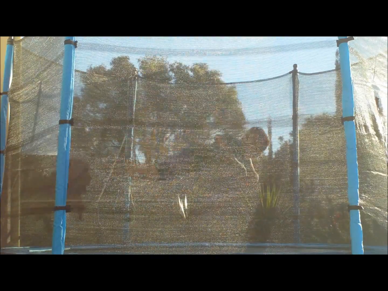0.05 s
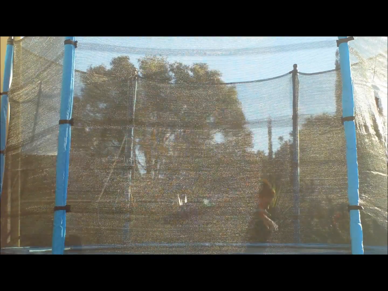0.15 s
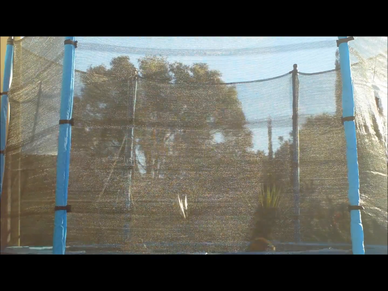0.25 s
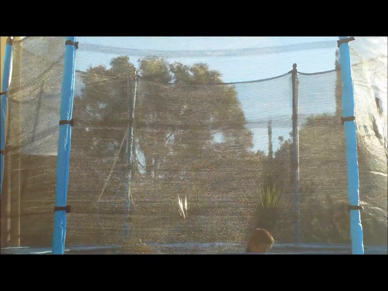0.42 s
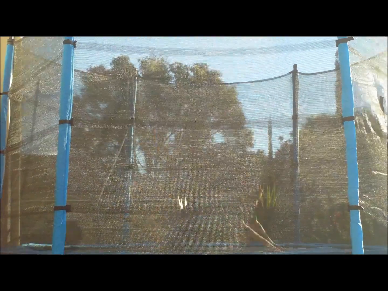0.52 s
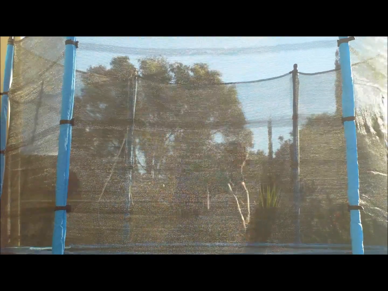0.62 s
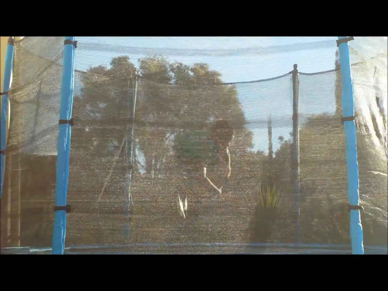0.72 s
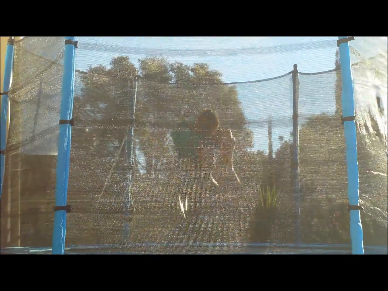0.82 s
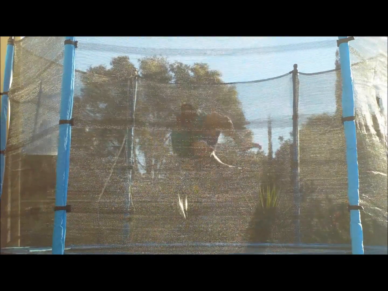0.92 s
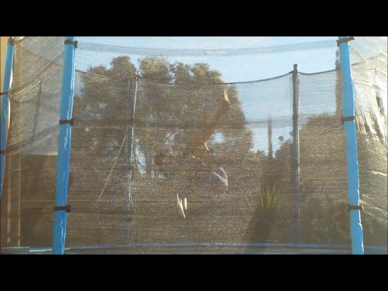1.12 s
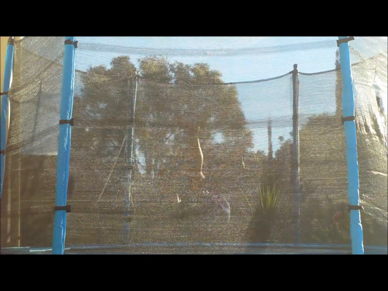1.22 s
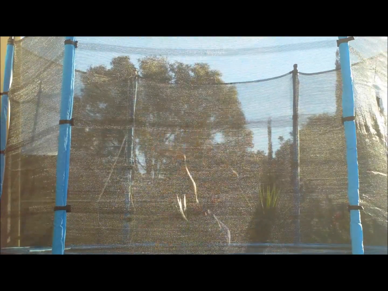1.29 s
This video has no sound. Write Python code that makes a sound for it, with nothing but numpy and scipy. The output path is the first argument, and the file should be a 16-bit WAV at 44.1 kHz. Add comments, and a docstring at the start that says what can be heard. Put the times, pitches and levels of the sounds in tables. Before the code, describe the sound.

One trampoline bounce, a sharp slap and thumps with steel springs grating and creaking.

```python
"""A trampoline mat takes a jumper: a sharp slap, a rumble of stretching fabric, thumps as the body sinks in.
The steel springs grate in their hooks by stick-slip, snap and ring on in the frame.
Behind them are a faint bird, a distant outdoor hum and a soft rush; the yard answers briefly."""
import sys
import numpy as np
from scipy import signal
from scipy.fft import rfft, irfft, next_fast_len
from scipy.io import wavfile
from scipy.ndimage import map_coordinates

SR = 44100
rng = np.random.default_rng(int(sys.argv[2]) if len(sys.argv) > 2 else 0)


def int16_out(signal):
    """Quantize to a 16-bit WAV file."""
    q = np.round(np.clip(np.atleast_2d(signal).T, -1, 1) * 32767)
    wavfile.write(sys.argv[1], SR, q.astype(np.int16))


N = 59535
TIME_S = np.arange(N) / SR


def amp(db):
    """Decibels to gain."""
    return 10 ** (np.asarray(db) / 20)


def unit(x):
    """Scale to rms 1."""
    return x / np.sqrt(np.mean(x ** 2) + 1e-20)


def along(points, hz):
    """Interpolate (Hz, value) points on a log axis."""
    knots_hz, values = np.transpose(points)
    return np.interp(np.log(hz + 1), np.log(knots_hz + 1), values)


def curves(rows):
    """One value per sample for each column after the time."""
    knots_s, *columns = np.transpose(rows)
    return [np.interp(TIME_S, knots_s, column) for column in columns]


def wobble(rate_hz):
    """Smooth random curve, rate_hz knots a second."""
    return map_coordinates(rng.standard_normal(N // 4), [TIME_S * rate_hz], mode="mirror")


def filtered(x, response):
    """Apply a frequency response."""
    size = next_fast_len(N + SR // 2)
    return irfft(rfft(x, size) * response(np.fft.rfftfreq(size, 1 / SR)), size)[..., :N]


def coloured(x, spectrum):
    """Shape by a (Hz, dB) spectrum, at rms 1."""
    return unit(filtered(x, lambda hz: amp(along(spectrum, hz))))


def noise(spectrum):
    """Coloured noise at rms 1."""
    return coloured(rng.standard_normal(N), spectrum)


def fading(x, decay):
    """Fade each frequency by a (Hz, T60) table."""
    hz, time_s, bins = signal.stft(x, SR, nperseg=256)
    envelope = amp(-60 * time_s / along(decay, hz)[:, None])
    return signal.istft(bins * envelope, SR, nperseg=256)[1][:N]


def ringing(x, decay):
    """Pass through a dense set of fading modes."""
    tail = fading(rng.standard_normal(N), decay)
    return signal.fftconvolve(x, tail / np.linalg.norm(tail))[:N]


def add(out, start_s, db, x, attack_s):
    """Mix in an event with a soft onset."""
    start = round(start_s * SR)
    onset = 1 - np.exp(-TIME_S / attack_s)
    out[start:] += (amp(db) * x * onset)[:N - start]


# One sharp slap on the mat and its quick, fluttering echoes (time [s], level [dB])
SLAP_AND_ECHOES = [(0.221, -18), (0.2242, -21.5), (0.2387, -25.5)]
# Skin crack (frequency [Hz], level [dB])
CRACK_SPECTRUM = [(500, -22), (1500, -4), (3300, -4), (4250, 6), (4900, -5), (6000, -9), (8500, -22),
                  (15000, -32)]
# Slapped fabric (frequency [Hz], level [dB])
SLAP_SPECTRUM = [(80, -42), (180, -12.5), (330, -19), (480, -4), (660, -2), (930, 3.5), (1300, -8.5),
                 (2000, -17.5), (2650, -10), (3300, -20), (4250, -10), (4730, -21), (5400, -16),
                 (7000, -27.5), (8600, -25.5), (15000, -50)]
# Slap decay (frequency [Hz], T60 [s])
SLAP_DECAY = [(200, 0.13), (900, .11), (4000, 0.16), (12000, 0.17)]


def mat_slap(crack_db=-11.5, crack_t60_s=0.015):
    """Skin cracks against the taut fabric: one sharp slap with quick, fluttering echoes."""
    out = np.zeros(N)
    crack = noise(CRACK_SPECTRUM) * amp(-60 * TIME_S / crack_t60_s)
    add(out, SLAP_AND_ECHOES[0][0], crack_db, crack, attack_s=0.00024)
    for start_s, db in SLAP_AND_ECHOES:
        add(out, start_s, db, fading(noise(SLAP_SPECTRUM), SLAP_DECAY), attack_s=0.00071)
    return out


# Body knocks (time [s], level [dB], centre [Hz])
THUMPS = [(0.449, -25.5, 400), (0.4535, -15, 1570), (0.465, -18.5, 600), (0.481, -21.5, 520),
          (0.499, -22.5, 820), (0.544, -29, 756), (0.737, -38, 410)]
# Knocked mat (frequency [Hz], level [dB])
THUMP_SPECTRUM = [(60, -36), (130, -14), (270, -21.5), (350, -11), (430, -7.5), (580, -2.5), (760, -2.5),
                  (980, 0.5), (1230, -9), (1500, 0), (1850, -2.5), (2400, -11.5), (3200, -14), (5500, -50)]
# Knock decay (frequency [Hz], T60 [s])
THUMP_DECAY = [(150, 0.22), (600, 0.092), (2500, 0.089)]
# Drum tones of the mat (frequency [Hz], relative level [dB], T60 [s])
MAT_MODES = [(352.6, -4, .14), (591, 0.5, 0.093)]


def mat_thumps(tones_db=-7, half_width_oct=0.41):
    """The sinking body drums on the mat; each knock stresses the band around its centre."""
    out = np.zeros(N)
    for start_s, db, centre_hz in THUMPS:
        def contact(hz):
            return 0.28 + 1 / (1 + (np.log2((hz + 1) / centre_hz) / half_width_oct) ** 2)

        knock = fading(unit(filtered(noise(THUMP_SPECTRUM), contact)), THUMP_DECAY)
        tones = np.zeros(N)
        for hz, mode_db, t60_s in MAT_MODES:
            envelope = contact(hz) * amp(mode_db - 60 * TIME_S / t60_s)
            tones += envelope * np.sin(2 * np.pi * (hz * TIME_S + rng.random()))
        add(out, start_s, db, knock + amp(tones_db) * tones, attack_s=0.00081)
    return out


# Fabric rumble envelope (time [s], level [dB])
STRETCH_ENVELOPE = [(0.22, -67), (0.25, -38.5), (0.33, -36.5), (0.39, -48), (0.43, -52), (0.48, -41),
                    (0.56, -48), (0.63, -60), (0.8, -59)]
# Fabric rumble (frequency [Hz], level [dB])
STRETCH_SPECTRUM = [(30, -32), (70, -20), (130, -16.5), (230, -1.5), (350, 0.5), (550, -1.5), (1000, -4),
                    (2000, -5.5), (5000, -11), (12000, -32)]


def mat(low_cut_hz=176):
    """High-passed impacts over the rumble of the stretching fabric."""
    low_cut = signal.butter(4, low_cut_hz, "highpass", fs=SR, output="sos")
    impacts = signal.sosfilt(low_cut, mat_slap() + mat_thumps())
    stretch_db, = curves(STRETCH_ENVELOPE)
    return impacts + amp(stretch_db) * noise(STRETCH_SPECTRUM)


def slips(rate_hz=5000, spread_db=1.5):
    """Tiny stick-slip impulses of uneven size at random moments."""
    slipping = rng.random(N) < rate_hz / SR
    size = amp(spread_db * rng.standard_normal(N))
    return slipping * size * rng.choice([-1, 1], N)


# Spring resonances (frequency [Hz], width [Hz], relative level [dB])
SPRING_MODES = [(1865, 190, -2.5), (2420, 110, -19), (3340, 130, -19), (4040, 300, -9), (5390, 240, -4.5),
                (5970, 90, -11), (6570, 220, 1.5), (7160, 200, -6.5), (7950, 160, -2), (8500, 200, 2),
                (8920, 150, 0.5), (10330, 190, 0)]


def steel(x, modes_db):
    """An excitation plus the resonances it wakes in the springs."""
    def modes(hz):
        return sum(amp(db) * 1j * hz * width_hz / (mode_hz ** 2 - hz ** 2 + 1j * hz * width_hz)
                   for mode_hz, width_hz, db in SPRING_MODES)

    return filtered(x, lambda hz: 1 + amp(modes_db) * modes(hz))


# Grating envelopes (time [s], hook level [dB], coil level [dB])
GRATE_ENVELOPES = [(0.22, -83, -85), (0.28, -47.5, -55), (0.31, -37, -42), (0.338, -24, -29.5),
                   (0.354, -18.5, -22), (0.398, -16.5, -22), (0.416, -19.5, -21.5), (0.44, -21, -26),
                   (0.455, -24, -21), (0.49, -21.5, -24.5), (0.528, -24.5, -29), (0.56, -22.5, -26),
                   (0.595, -24, -27.5), (0.632, -38, -36.5), (0.68, -47, -39), (0.76, -41, -40.5),
                   (0.86, -58, -65)]
# Bright hook slips (frequency [Hz], level [dB])
HOOK_SPECTRUM = [(150, -60), (1500, -38), (3500, -17), (5300, -2), (7000, 2), (7650, 2), (7880, -8.5),
                 (8100, 1.5), (8900, 1.5), (9400, -4), (10400, -7), (11800, -10), (15000, -13.5)]
# Coil rasp (frequency [Hz], level [dB])
COIL_SPECTRUM = [(40, -62), (200, -40), (380, -21), (900, -6), (1250, -5.5), (1800, -1.5), (2700, 0),
                 (3350, 2), (3750, -5), (4150, 0.5), (5500, -7.5), (9000, -45)]
# Hooks snapping over the frame (time [s], level [dB])
SNAPS = [(0.3, -28.5), (0.3526, -20), (0.361, -21), (0.374, -12), (0.3898, -11.5), (0.3969, -10.5),
         (0.423, -9), (0.4545, -17.5), (0.4829, -20), (0.651, -27), (0.6868, -33), (0.692, -25),
         (0.7555, -26), (0.8103, -36.5)]
# Snap decay (frequency [Hz], T60 [s])
SNAP_DECAY = [(2000, 0.025), (8000, 0.045), (14000, .018)]
# Frame decay (frequency [Hz], T60 [s])
FRAME_DECAY = [(500, 1), (2000, 0.26), (7000, 0.76), (10000, 0.31), (14000, 0.18)]


def springs(frame_db=-16):
    """Hooks grate and snap under load; coils rasp and the frame rings on."""
    hook_db, coil_db = curves(GRATE_ENVELOPES)
    judder_db = 0.81 * wobble(rate_hz=170.2)
    out = amp(hook_db + judder_db) * coloured(steel(slips(), modes_db=-14), HOOK_SPECTRUM)
    out += amp(coil_db + judder_db) * coloured(steel(slips(), modes_db=4.5), COIL_SPECTRUM)
    for start_s, db in SNAPS:
        snap = coloured(steel(rng.standard_normal(N), modes_db=3), HOOK_SPECTRUM)
        add(out, start_s, db, fading(snap, SNAP_DECAY), attack_s=0.00034)
    return out + amp(frame_db) * ringing(steel(out, modes_db=-1), FRAME_DECAY)


# Bird notes (time [s], length [s], start pitch [Hz], end pitch [Hz], level [dB])
CHIRPS = [(0.004, 0.019, 3700, 4090, -40.5), (0.021, 0.027, 4020, 3686, -39.5),
          (0.042, 0.017, 3980, 3880, -46), (0.103, 0.066, 4080, 3790, -43.5),
          (0.162, 0.022, 4020, 3910, -43.5), (0.182, 0.039, 3940, 3610, -39.5),
          (1.169, 0.052, 3900, 3740, -48), (1.22, 0.07, 3660, 3500, -48.5)]


def bird(quaver_hz=196, octave_db=-15, rough_db=4, yard_db=-2.5):
    """Rough, quavering glides from the trees, blurred by the yard."""
    out = np.zeros(N)
    for start_s, length_s, start_hz, end_hz, db in CHIRPS:
        progress = np.clip(TIME_S / length_s, 0, 1)
        hz = start_hz + (end_hz - start_hz) * progress + quaver_hz * wobble(rate_hz=350)
        phase = 2 * np.pi * np.cumsum(hz) / SR
        tone = np.sin(phase) + amp(octave_db) * np.sin(2 * phase)
        envelope = np.sin(np.pi * progress) * amp(rough_db * wobble(rate_hz=409))
        add(out, start_s, db, envelope * tone, attack_s=0.00084)
    return out + amp(yard_db) * yard(out)


# Yard decay (frequency [Hz], T60 [s])
YARD_DECAY = [(150, .35), (1000, 0.53), (10000, 0.3)]


def yard(x):
    """Brief outdoor reverberation."""
    return ringing(x, YARD_DECAY)


# Distant hum envelope (time [s], level [dB])
HUM_ENVELOPE = [(0, -40), (0.2, -40.5), (0.8, -42.5), (1.1, -44), (1.35, -41.5)]
# Distant hum (frequency [Hz], level [dB])
HUM_SPECTRUM = [(25, -46), (90, -26), (175, -18), (235, -15.5), (330, -6), (470, -11), (700, -3),
                (1000, 1.5), (1400, -2.5), (1900, -1), (2500, -7), (3500, -7), (4500, -10.5), (6000, -14.5),
                (7500, -19), (9000, -20), (15000, -29)]
# Soft rush envelope (time [s], level [dB])
RUSH_ENVELOPE = [(0, -62), (0.2, -48), (0.8, -44), (1.1, -42.5), (1.35, -45)]
# Soft rush (frequency [Hz], level [dB])
RUSH_SPECTRUM = [(25, -39), (120, -36), (175, -9), (230, -28), (320, -13), (650, -7), (900, 1.5), (1120, 1),
                 (1900, -7.5), (3000, -21.5), (6000, -19.5), (8700, -21), (15000, -29)]


def air():
    """Distant neighbourhood hum with a soft rush swelling over it."""
    out = np.zeros(N)
    for envelope, spectrum in [(HUM_ENVELOPE, HUM_SPECTRUM), (RUSH_ENVELOPE, RUSH_SPECTRUM)]:
        level_db, = curves(envelope)
        flicker_db = 0.29 * wobble(rate_hz=24.9)
        out += amp(level_db + flicker_db) * noise(spectrum)
    return out


# Stereo spread of yard and air (frequency [Hz], side gain [dB])
SIDE_GAIN = [(30, -7), (70, -8), (150, -15), (500, -27), (3000, -23.5), (8000, -21), (12000, -50)]


def scene(yard_db=-14):
    """Near, almost mono trampoline; yard and air add a little width, mostly in the bass."""
    trampoline = mat() + springs()
    mid = trampoline + amp(yard_db) * yard(trampoline) + air() + bird()
    side = filtered(yard(trampoline) + air(), lambda hz: amp(along(SIDE_GAIN, hz)))
    return np.array([mid + side, mid - side])


# Channel balance (frequency [Hz], left minus right [dB])
BALANCE = [(60, 7), (300, 4), (1100, 3), (2100, 2.7), (4000, 2.5), (8800, 3), (10500, -0.7), (13000, 0)]


def record(dry, ceiling=0.95, hardness=8, top_hz=15280):
    """Lean left, round the highest peaks, limit the band."""
    leaning = filtered(dry, lambda hz: amp(np.outer([0.5, -0.5], along(BALANCE, hz))))
    rounded = leaning / (1 + np.abs(leaning / ceiling) ** hardness) ** (1 / hardness)
    return filtered(rounded, lambda hz: hz < top_hz)


dry = scene()
out = record(dry)
int16_out(out)
```